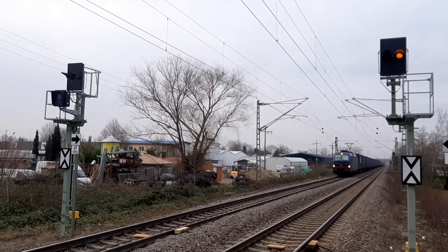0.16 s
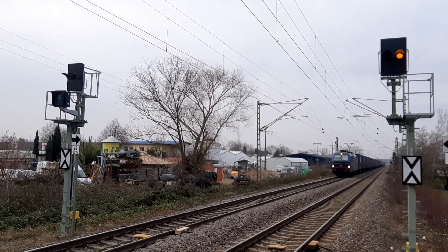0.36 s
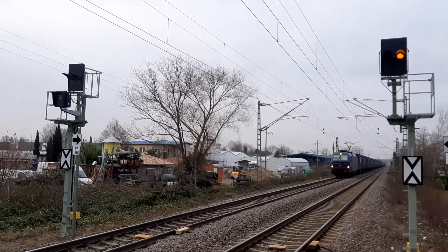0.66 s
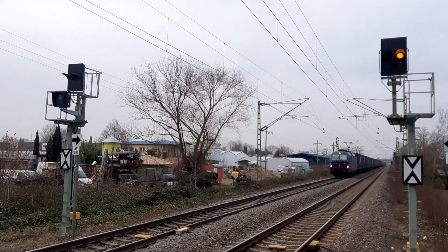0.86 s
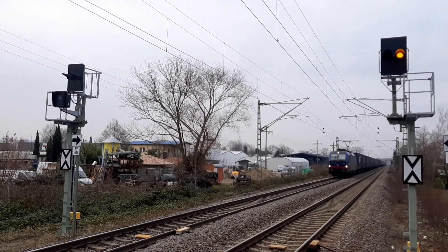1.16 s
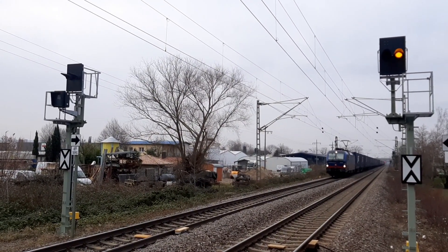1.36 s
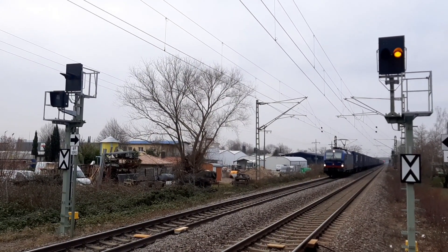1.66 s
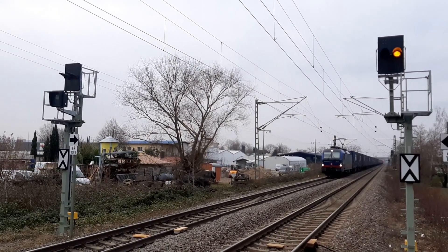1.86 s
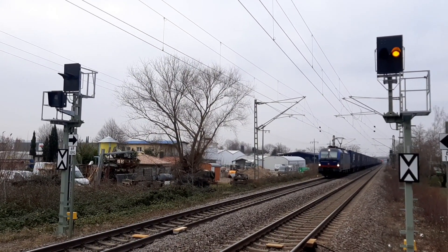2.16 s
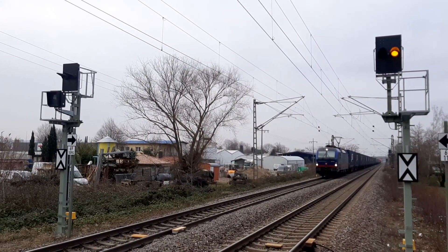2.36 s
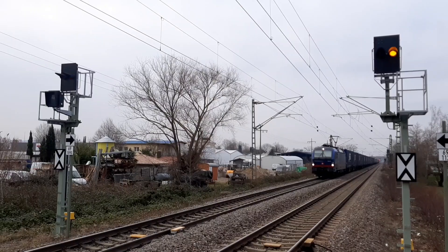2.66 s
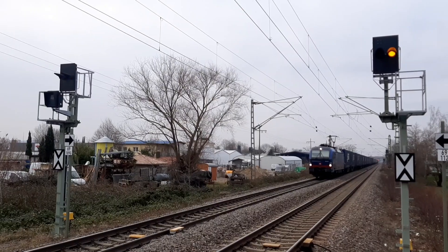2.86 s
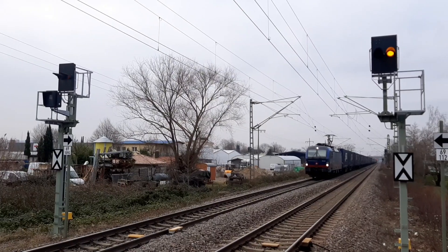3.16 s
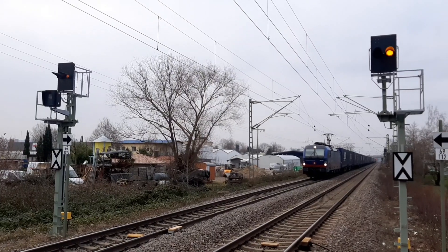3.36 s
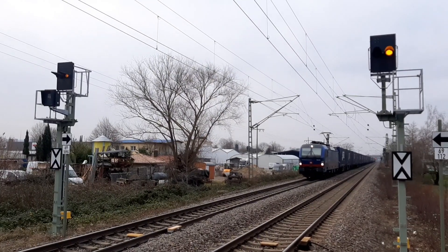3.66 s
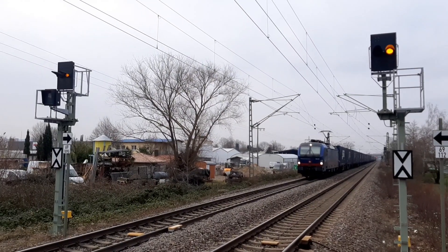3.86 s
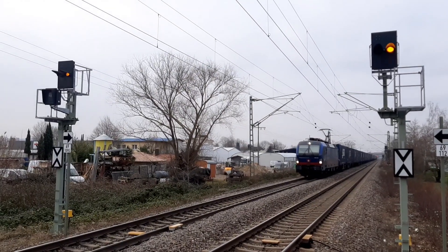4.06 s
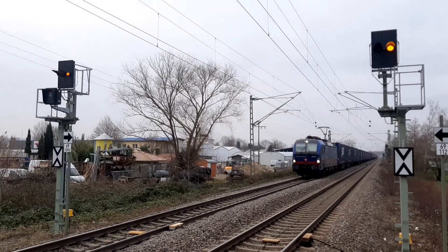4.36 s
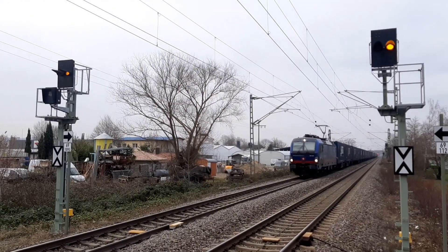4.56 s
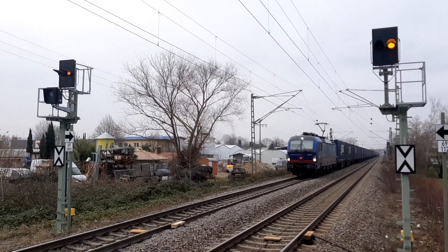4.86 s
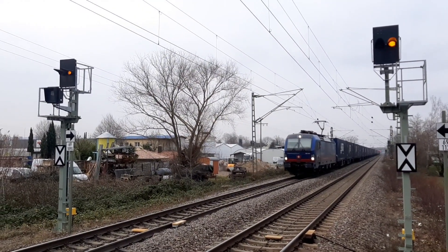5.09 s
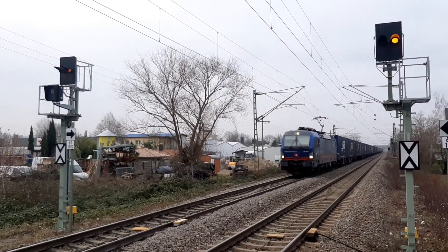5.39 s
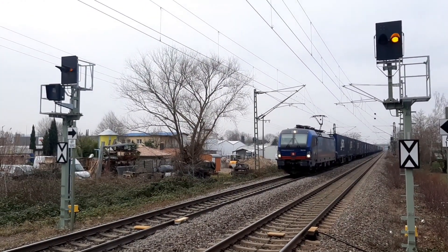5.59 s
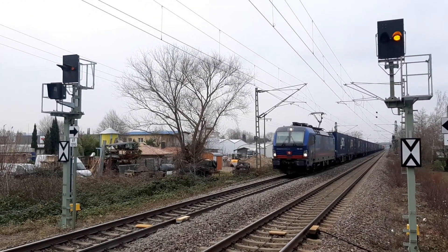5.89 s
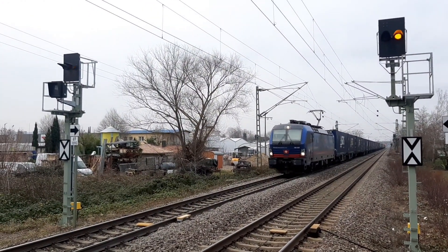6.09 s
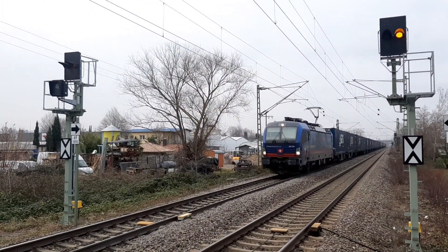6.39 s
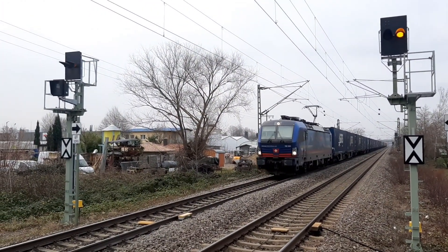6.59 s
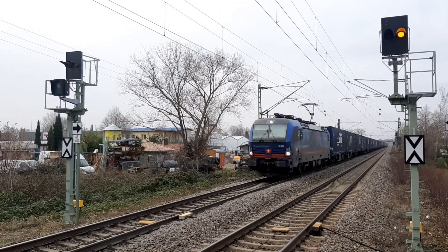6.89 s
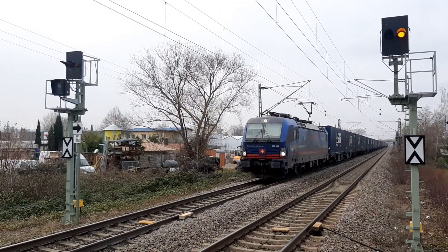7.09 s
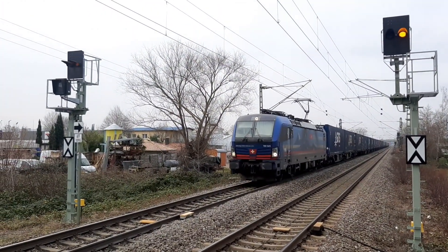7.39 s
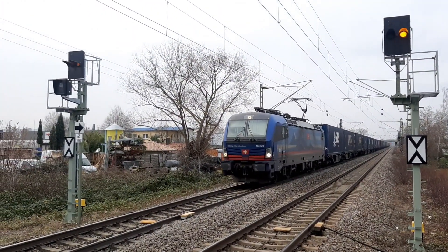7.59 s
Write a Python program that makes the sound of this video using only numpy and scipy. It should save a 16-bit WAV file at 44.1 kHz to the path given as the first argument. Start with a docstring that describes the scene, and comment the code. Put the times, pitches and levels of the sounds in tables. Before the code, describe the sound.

A breezy trackside scene. Faint humming rails and airy background hiss come first, then gusts rumble and crackle against the unprotected microphones, strongest around three, four and six seconds. Rail tones become fuzzier and more insistent, with a thin high whine coming and going. The steady rushing roll of a freight train gradually rises underneath and is loudest at the end.

```python
"""Open railway track in a breeze: an electric freight train draws near a handheld pair of microphones.
The rails sing in two fuzzy bands, noise through drifting resonances with some pure tone in the lower;
the rolling roar and wheel bands are grainy shaped noise that grows. Behind lie a far wash and treble
hiss with ticks. Wind buffets the ports in noise puffs, low thuds, pops and a snap; thin sine whines
come and go."""
import sys
import numpy as np
from scipy import signal
from scipy.fft import rfft, irfft, next_fast_len
from scipy.io import wavfile

SR = 44100
rng = np.random.default_rng(int(sys.argv[2]) if len(sys.argv) > 2 else 0)


def generate_wav(sig):
    """Save sig (samples, or channels by samples) to the path in sys.argv[1] as 16-bit PCM at SR."""
    pcm = np.round(np.clip(np.atleast_2d(sig).T, -1, 1) * 32767).astype(np.int16)
    wavfile.write(sys.argv[1], SR, pcm)


N = 341334
T = np.arange(N) / SR
LAG_S = 22 / SR  # the train reaches the right port first
LEFT_LATE = np.array([[1], [0]])  # picks the left port for a delay


def gain_of(db):
    """Decibels to a factor."""
    return 10 ** (np.asarray(db) / 20)


def evened(x):
    """Scaled to rms 1."""
    return x / np.sqrt(np.mean(x ** 2, axis=-1, keepdims=True) + 1e-20)


def read(points, hz):
    """A spectrum table at the frequencies hz, straight lines over log frequency."""
    f, value = np.transpose(points)
    return np.interp(np.log(hz + 1), np.log(f + 1), value)


def curves(rows):
    """The columns of a time table, one value a sample."""
    s, *columns = np.transpose(rows)
    return [np.interp(T, s, c) for c in columns]


def sides(pan_db):
    """Left and right gains for a left-right level step, at constant summed power."""
    g = gain_of(np.array([pan_db / 2, -pan_db / 2]))
    return g * 2 / np.sqrt((g ** 2).sum(0))


def coloured(x, gain):
    """Applies a gain rule gain(hz) along the spectrum."""
    size = next_fast_len(N)
    return irfft(rfft(x, size) * gain(np.fft.rfftfreq(size, 1 / SR)), size)[..., :N]


def wobble(per_s, channels):
    """Slow chance movement: low-passed noise of rms 1, drawn every 64 samples."""
    steps = N // 64 + 2
    hz = np.fft.rfftfreq(steps, 64 / SR)
    spectrum = rfft(rng.standard_normal((channels, steps))) / (1 + (hz / per_s) ** 2)
    slow = evened(irfft(spectrum, steps))
    return np.array([np.interp(T, np.arange(steps) * 64 / SR, c) for c in slow])


def ring(x, hz, width, steady):
    """A resonance applied twice that follows the curve hz; steady 0-1 irons out its chance swells."""
    turn = np.exp(2j * np.pi * np.cumsum(hz * np.ones(N)) / SR)
    r = np.exp(-np.pi * width / SR)
    slow = signal.lfilter([1], [1, -2 * r, r * r], x * turn.conj())
    ironed = slow / (abs(slow) + 1e-9) ** np.clip(steady, 0, 1)
    return evened((turn * ironed).real)


# how alike the two ports hear a source: [f/Hz, likeness 0-1]
LIKENESS = [(300, 0.94), (800, 0.18), (1500, 1), (2000, 0.42), (3500, 0.22), (5000, 0.19)]


def from_track():
    """Noise that both ports partly share, the left one a little late."""
    a, b = rng.standard_normal((2, N))
    same = lambda hz: np.clip(read(LIKENESS, hz), 0, 1)
    late = coloured(a, lambda hz: same(hz) * np.exp(-2j * np.pi * hz * LAG_S))
    own = coloured(b, lambda hz: np.sqrt(1 - same(hz) ** 2))
    return np.array([late + own, a])


# the rails' song before its chance swells: [t/s, low band level/dB, high band level/dB]
RAIL_LEVELS = [(0, -53, -47), (.17, -57.5, -50.5), (.25, -52.5, -59.5), (.9, -51.5, -55.5),
               (1.03, -62, -54.5), (1.55, -77, -55.5), (1.8, -56, -48.5), (2.07, -63, -51.5),
               (2.3, -59.5, -60), (2.7, -53.5, -48), (2.9, -62, -48.5), (3.2, -54, -47), (3.35, -63, -45.5),
               (3.55, -62, -45.5), (3.8, -48.5, -50.5), (4.0, -46.5, -44.5), (4.15, -48.5, -41.5),
               (4.27, -44.5, -46.5), (4.4, -53.5, -50.5), (4.5, -48, -43), (4.75, -55, -44),
               (5.0, -50, -48), (5.1, -46.5, -50), (5.23, -45, -41), (5.38, -46.5, -52.5),
               (5.55, -45.5, -48.5), (5.8, -44, -44), (5.95, -50.5, -44.5), (6.1, -45, -39.5),
               (6.35, -54.5, -53), (6.55, -46, -39), (6.65, -46.5, -39.5), (6.8, -45, -46.5),
               (7.05, -53, -44), (7.15, -52, -38.5), (7.25, -51, -51), (7.45, -46, -47), (7.55, -43, -42),
               (7.74, -43, -44.5)]
# drifting pitch of the song: [t/s, low band f/Hz, high band f/Hz, share of pure tone in the low band 0-1]
RAIL_PITCH = [(0, 703, 1408, .9), (.95, 703, 1405, .9), (1.02, 703, 1404, 0), (2.8, 705, 1408, 0),
              (3.6, 710, 1418, 0), (4.1, 711, 1419, .2), (4.2, 710, 1419, .85), (4.5, 707, 1420, .6),
              (4.7, 704, 1420, .2), (5.6, 708, 1421, .2), (7.74, 712, 1424, 0)]
# resonance widths of the low and high rail bands: [width/Hz]
RAIL_WIDTHS = (26, 34)
SWELL_DB, SWELLS_PER_S = 2.5, 18  # the song swells and sinks by chance
RAIL_LAG_S, RAIL_SAME = 0.0002, 0.52  # the low song comes from nearer the middle


def rail_song():
    """Two bending bands of the rails: narrow ringing noise, the low one mixed with a pure tone."""
    low_hz, high_hz, pure = curves(RAIL_PITCH)
    swell_depth = [1 - pure, np.ones(N)]  # a pure tone holds steady
    swells = SWELL_DB * wobble(SWELLS_PER_S, channels=2) * swell_depth
    low_db, high_db = curves(RAIL_LEVELS) + swells
    turns = np.cumsum(low_hz) / SR - low_hz * RAIL_LAG_S * LEFT_LATE
    tone = np.sqrt(2) * np.sin(2 * np.pi * turns)
    a, b = rng.standard_normal((2, N))
    late = np.roll(a, round(RAIL_LAG_S * SR))
    near = np.array([RAIL_SAME * late + np.sqrt(1 - RAIL_SAME ** 2) * b, a])
    fuzz = ring(near, low_hz, RAIL_WIDTHS[0], steady=0.23)
    low = pure * tone + np.sqrt(1 - pure ** 2) * fuzz
    high = ring(rng.standard_normal((2, N)), high_hz, RAIL_WIDTHS[1], steady=0.15)
    return gain_of(low_db) * low + gain_of(high_db) * high


# the approach, reference for roar and wheel bands: [t/s, level/dB]
ROLLING_LEVEL = [(0.0, -63.5), (0.34, -63), (1.16, -63), (3.02, -60), (3.12, -58.5), (3.45, -59),
                 (4.68, -56.5), (5.6, -52.5), (7.18, -49.5), (7.39, -47), (7.74, -47)]
# colour of the broad roar: [f/Hz, level/dB per Hz]
ROAR_COLOUR = [(180, -51.5), (300, -8.5), (708, 0), (1160, -12.5), (1440, 2), (1650, -5), (1800, -4.5),
               (2110, -7), (3090, -15), (6360, -30.5), (7800, -52), (10100, -102), (17200, -120)]
# rail and wheel bands, and a low hum of the locomotive at 160 Hz: [f/Hz, width/Hz, level/dB above the rolling
# reference]
ROLLING_BANDS = [(159.8, 16, -3), (1754, 49, -6.5), (1860, 45, -18), (2053, 103, -6.5), (2191, 55, -10.5),
                 (2482, 60, -18.5), (2827, 110, -11.5), (3554, 170, -15), (3834, 240, -17)]
BROAD_DB = 7.5  # the broad roar above the reference of the wheel bands
WANDER = 0.003  # share by which each band drifts in pitch


def rolling():
    """Wheel roughness as grainy noise drives a broad roar and a set of resonant bands, among them a low
    locomotive hum."""
    rolling_db, = curves(ROLLING_LEVEL)
    drive = from_track() * gain_of(1.27 * wobble(27, channels=1))  # uneven wheels make it grainy
    roar = gain_of(BROAD_DB) * evened(coloured(drive, lambda hz: gain_of(read(ROAR_COLOUR, hz))))
    for hz, width, db in ROLLING_BANDS:
        level = gain_of(db + 3.9 * wobble(24, channels=1))
        drifting_hz = hz * (1 + WANDER * wobble(5.3, channels=1)[0])
        roar += level * ring(drive, drifting_hz, width, steady=0)
    return gain_of(rolling_db) * roar


# far outdoor wash: [f/Hz, level/dB per Hz]
WASH_COLOUR = [(140, -39), (240, -2), (615, -7.5), (704, 1.5), (820, -11.5), (1140, -7), (1420, -8.5),
               (1920, -17), (2100, -16.5), (5710, -24), (9000, -57.5), (11700, -80), (19800, -120)]
# balance of the wash: [f/Hz, left-right level/dB]
WASH_PAN = [(300, 1), (1000, 1.5), (3500, -0.5), (4800, -8), (9000, -43)]
# breeze in distant grass and branches; the mean sets the wash, the rest lifts its treble: [t/s, level/dB]
BREEZE_LEVEL = [(0, -56), (.55, -55), (.7, -50.5), (.95, -51.5), (1.2, -55.5), (2.4, -51.5), (2.7, -49.5),
                (3.2, -46), (3.8, -48.5), (4.0, -46.5), (4.6, -50), (7.74, -52.5)]


def air():
    """The far wash of the open country: shaped noise whose treble rises and falls with the breeze."""
    wash = coloured(from_track(), lambda hz: gain_of(read(WASH_COLOUR, hz)) * sides(read(WASH_PAN, hz)))
    treble = coloured(wash, lambda hz: 1 / (1 + (2500.0 / (hz + 1)) ** 4))
    breeze_db, = curves(BREEZE_LEVEL)
    mean_db = breeze_db.mean()
    lift = gain_of(breeze_db - mean_db)
    level = gain_of(mean_db + 1.25 * wobble(13.0, channels=1))
    return level * (wash + (lift - 1) * treble) / wash.std()


# high hiss that swells briefly, before its colour: [t/s, level/dB, left-right level/dB]
HISS_LEVEL = [(0, -72, -7), (.17, -79.5, -4), (1.0, -80.5, -1), (2.3, -82, -1.5), (3.15, -76, -4),
              (3.45, -78.5, -3), (3.86, -69.5, -8), (3.95, -62, -2), (4.1, -62, -6), (4.29, -66.5, -14),
              (4.39, -63, -20), (4.41, -71, -12), (4.55, -70.5, -14), (4.65, -78.5, -4), (5.5, -76.5, -5),
              (6.2, -75, -6), (7.74, -74.5, -4)]
# colour of hiss and ticks: [f/Hz, level/dB]
HISS_SPECTRUM = [(2500, -46.5), (4000, -32.5), (6000, 10), (7600, 4), (8200, -40), (9300, -11), (10300, -3),
                 (11500, 1), (13000, 1.5), (15600, 3)]
# faint dry ticks, before their colour: [t/s, level/dB, left-right level/dB]
DRY_TICKS = [(4.389, -52, -14), (4.545, -54, -10), (4.572, -43, -14), (5.942, -61, -6)]


def hiss():
    """White noise and short decaying noise ticks, through a treble colour with a hollow near 8 kHz."""
    db, pan = curves(HISS_LEVEL)
    drive = gain_of(db + 0.87 * wobble(19, channels=2)) * sides(pan) * rng.standard_normal((2, N))
    decay = np.exp(-np.arange(80) / 24.0)  # in samples
    for s, tick_db, tick_pan in DRY_TICKS:
        at = round(s * SR)
        grit = np.diff(rng.standard_normal((2, 81))) / 2
        drive[:, at:at + 80] += gain_of(tick_db) * sides(tick_pan)[:, None] * decay * grit
    return coloured(drive, lambda hz: gain_of(read(HISS_SPECTRUM, hz)))


def eddies(colour, lumps_db, shared, puffs_per_s):
    """Turbulence at the ports: a lumpy train of small puffs, a share of it common to both."""
    puffs = rng.random((3, N)) < puffs_per_s / SR
    left, right, both = rng.standard_normal((3, N)) * puffs
    train = gain_of(lumps_db) * (np.array([left, right]) + shared * both)
    return evened(coloured(train, lambda hz: gain_of(read(colour, hz))))


# colour of the low buffet: [f/Hz, level/dB per Hz]
BUFFET_COLOUR = [(12, -40), (22, -13), (40, 3.5), (65, 8), (110, 4.5), (200, -1.5), (300, -22), (500, -57),
                 (1500, -120)]
# colour of the flutter above it: [f/Hz, level/dB per Hz]
FLUTTER_COLOUR = [(130, -50), (200, -1), (280, -2.5), (420, -5.5), (650, -11), (1000, -18), (2000, -52),
                  (4000, -71.5), (7000, -120)]
# wind between its lumps: [t/s, low buffet level/dB, upper flutter level/dB]
WIND_LEVELS = [(0, -43, -62), (0.5, -52.5, -59.5), (1, -49, -53), (1.4, -44, -65), (1.7, -40, -52),
               (2.0, -42.5, -62), (2.4, -45, -54), (2.9, -40, -48.5), (3.15, -30.5, -40),
               (3.35, -37, -53.5), (3.9, -38.5, -48.5), (4.15, -31, -46.5), (4.3, -46, -49.5),
               (5, -47.5, -49.5), (5.6, -46.5, -48), (5.7, -31.5, -36), (6.0, -33.5, -46), (6.2, -46, -43),
               (6.45, -27, -37.5), (6.75, -47, -49.5), (7.2, -38, -45), (7.73, -39.5, -42.5)]
# lumps of air that thump both ports: [t/s, thud level/dB, thud f/Hz, flutter level/dB, left-right level/dB]
AIR_LUMPS = [(0.11, -32.5, 61.5, -53, 2), (1.261, -32.5, 71.6, -48.5, 4), (1.405, -35.5, 100, -56, 0),
             (1.47, -30, 62.4, -43.5, -10), (1.538, -43, 100, -67, -10), (1.604, -26, 164, -38.5, 2.5),
             (1.658, -26.5, 89.5, -46, -1), (1.713, -32, 128, -56, -5), (1.824, -30, 85.5, -43.5, -8),
             (1.855, -33, 142, -48, -10), (1.91, -29, 130, -51, 4), (2.089, -34, 167, -43, -8),
             (2.286, -32.5, 112, -48, -5), (2.556, -32.5, 65, -51, 1), (2.574, -29, 59, -74, 1),
             (2.611, -32, 110, -46, 3), (2.683, -38, 70, -43.5, -4), (2.777, -33, 75, -42.5, 0),
             (2.846, -35, 104, -60, -4), (3.025, -45, 126, -51, 9), (3.092, -23, 89, -46, -24),
             (3.176, -24, 105, -37, -22), (3.254, -34, 57, -43, -4), (3.438, -32, 92, -49, 2),
             (3.479, -27, 75, -40.5, -10), (3.597, -31, 109, -35.5, -2), (3.69, -38, 70.4, -55, -4),
             (3.727, -23, 102, -39.5, -1.5), (3.816, -25.5, 104, -30.5, 2.5), (3.835, -26, 100, -34, 10),
             (3.909, -24.5, 96, -53, -8), (3.976, -25, 98, -34, -7), (4.02, -29, 123, -40, 2),
             (4.055, -31, 70, -56, -12), (4.098, -30.5, 111, -41, -8), (4.138, -23, 90, -45, -5),
             (4.161, -22, 100, -37.5, 3), (4.343, -37, 97, -64, -17), (4.544, -31.5, 90, -57, -1),
             (4.638, -38.5, 47.5, -43, -0.5), (4.799, -34, 64, -52, -10), (4.956, -29.5, 77, -49, -5),
             (5.703, -26.5, 77.5, -50, 2), (5.765, -20.5, 64, -49, -1), (5.795, -25.5, 70, -47, 0),
             (5.82, -35, 80, -32.5, 0), (5.848, -36, 90, -35.5, 0), (5.905, -23.5, 73, -50, 2),
             (6.002, -24.5, 81.5, -27.5, 4), (6.049, -29, 110, -42.5, 2), (6.265, -25, 70, -30.5, 0),
             (6.296, -24, 90, -29.5, 1), (6.326, -26.5, 60.3, -48, 2), (6.389, -31, 100, -39, -3),
             (6.418, -36, 80, -39, 5), (6.506, -25, 100, -30, 4), (6.524, -30, 110, -34, -1),
             (6.586, -32.5, 91, -44, -1), (6.63, -28, 73, -36, -8), (6.68, -30.5, 78, -52, -20),
             (6.92, -33.5, 73.5, -63, -8), (7.109, -34, 70, -57, -20), (7.55, -31.5, 72.6, -35, -2)]
LUMP_TURNS, FLUTTER_LUMP_S = 0.92, 0.0096  # half widths: of a thud in cycles, of its flutter in s
# the bass drops out on one port for a moment: [start t/s, length t/s, port -1 left or 1 right]
BASS_DROPOUTS = [(0.198, 0.15, -1), (1.918, 0.14, -1), (2.315, 0.085, -1), (2.693, 0.05, -1),
                 (2.783, 0.16, -1), (3.223, 0.13, -1), (3.86, 0.048, -1), (4.65, 0.03, -1),
                 (4.74, 0.13, -1), (4.934, 0.018, -1), (6.085, 0.196, 1), (6.797, 0.084, -1),
                 (6.899, 0.095, -1), (7.136, 0.15, -1), (7.424, 0.06, -1), (7.587, 0.088, -1)]
DROP_DB, DROP_EDGE_S = -41.5, 0.015


def gusts():
    """Low buffet and the flutter above it; each lump adds a short low thud and a bump of flutter."""
    low_db, flutter_db = curves(WIND_LEVELS)
    flutter_power, thuds = gain_of(2 * flutter_db), np.zeros((2, N))
    starts = rng.random((len(AIR_LUMPS), 2))
    for (s, thud_db, hz, bump_db, pan_db), (turn, skew) in zip(AIR_LUMPS, starts):
        near = slice(max(round((s - .1) * SR), 0), round((s + .1) * SR))
        u = T[near] - s
        port_turn = np.array([[0], [0.73 * (skew - .5)]])  # the ports differ in phase, in cycles
        swing = np.sqrt(2) * np.cos(2 * np.pi * (hz * u + turn + port_turn))
        level = gain_of(thud_db + np.minimum([[pan_db], [-pan_db]], 0))  # panning only turns a port down
        thuds[:, near] += level * np.exp(-(u * hz / LUMP_TURNS) ** 2) * swing
        flutter_power[near] += gain_of(2 * bump_db) * np.exp(-(u / FLUTTER_LUMP_S) ** 2)
    drop = np.zeros((2, N))
    for start, length, port in BASS_DROPOUTS:
        inside = np.minimum(T - start, start + length - T)
        drop[int(port > 0)] += np.clip(inside / DROP_EDGE_S + 1, 0, 1)
    lumpy = wobble(20, channels=2)  # buffet and flutter heave together
    low = thuds + gain_of(low_db) * eddies(BUFFET_COLOUR, 2.76 * lumpy, shared=0.77, puffs_per_s=300)
    flutter = eddies(FLUTTER_COLOUR, 3.3 * lumpy, shared=0.53, puffs_per_s=420)
    return low * gain_of(DROP_DB * np.minimum(drop, 1)) + np.sqrt(flutter_power) * flutter


# the thin whine comes and goes, before its chance swells: [start t/s, end t/s, level/dB]
WHINE_SPELLS = [(1.1, 2.0, -77), (1.897, 2.725, -76), (3.1, 3.5, -77), (3.8, 4.7, -76.5), (5.0, 5.4, -79),
                (5.3, 6.12, -69)]
WHINE_HZ = 3872


def whines():
    """Thin sine tones that waver a little in pitch and level and fade in and out."""
    out = np.zeros((2, N))
    for start, end, db in WHINE_SPELLS:
        fade = np.clip(np.minimum(T - start, end - T) / .1, 0, 1)
        wavering_hz = WHINE_HZ * (1 + .0008 * wobble(9, channels=1)[0])
        turns = np.cumsum(wavering_hz) / SR - WHINE_HZ * LAG_S * LEFT_LATE
        level = gain_of(db + 5.7 * wobble(12.0, channels=2))
        out += level * fade * np.sqrt(2) * np.sin(2 * np.pi * turns)
    return out


# sharp pops of air, before filtering: [t/s, port -1 left or 1 right, peak level/dB, f/Hz,
# crack level/dB above the peak]
AIR_POPS = [(1.136, -1.0, -32, 270, -25), (1.269, -1.0, -29.5, 240, -25), (1.281, 1.0, -30, 215, -25),
            (1.463, -1.0, -22.5, 300, -25), (1.473, 1.0, -21, 220, -18), (1.578, 1.0, -31, 235, -25),
            (1.653, 1.0, -26, 300, -15), (1.688, 1.0, -31, 235, -25), (1.852, -1.0, -30, 280, -25),
            (1.881, 1.0, -32, 215, -25), (2.624, -1.0, -26.5, 280, -20), (2.667, -1.0, -32, 250, -22),
            (2.686, -1.0, -29, 430, -20), (2.967, 1.0, -33, 210, -20), (2.992, -1.0, -31, 210, -20),
            (2.998, 1.0, -32, 335, -22), (3.03, -1.0, -26, 245, -22), (3.031, 1.0, -30, 205, -25),
            (4.813, -1.0, -24, 450, -20), (4.928, -1.0, -27, 600, -15), (6.28, 1.0, -22, 330, -30),
            (6.39, 1.0, -21, 260, -30), (1.614, -1.0, -24, 363, -23), (1.625, -1.0, -27, 360, -7),
            (3.051, -1.0, -25.5, 440.0, -6), (3.073, -1.0, -20, 696, -13), (3.161, -1.0, -21, 540.0, -16),
            (3.169, -1.0, -18.5, 820.0, -8.5), (3.186, -1.0, -14.5, 410.0, -15),
            (3.197, 1.0, -16, 380, -30), (3.209, 1.0, -19, 260.0, -19), (3.231, -1.0, -15.5, 490, -6.5),
            (3.24, 1.0, -19.5, 305, -10), (3.248, -1.0, -24, 510.0, 1), (3.829, -1.0, -15.5, 440.0, -30),
            (3.869, -1.0, -24, 730, -2.5), (3.894, -1.0, -28, 610.0, -10), (4.159, 1.0, -16.5, 209, -22),
            (4.826, -1.0, -22.5, 600, -9), (5.669, -1.0, -15, 434, -22), (5.675, 1.0, -20.5, 470.0, -24),
            (5.69, -1.0, -20.5, 383, -16), (5.69, 1.0, -22, 412, -22), (5.762, 1.0, -10.5, 393, -23),
            (5.763, -1.0, -23, 457, -23), (5.818, -1.0, -19, 378, -8.5), (5.891, -1.0, -14.5, 256, -20),
            (5.89, 1.0, -9.5, 328, -17.5), (5.909, -1.0, -15, 350, -29), (6, -1.0, -28, 282, -21),
            (6.0, 1.0, -17, 334, -17.5), (6.211, 1.0, -19, 670, -12), (6.237, 1.0, -30.5, 1200.0, 6),
            (6.269, 1.0, -21, 450, -22), (6.428, -1.0, -14, 440.0, -33), (6.433, 1.0, -7.5, 400.0, -15),
            (6.437, -1.0, -7.5, 720, -16), (6.448, -1.0, -15, 470.0, -16), (6.454, 1.0, -8.5, 380.0, -29),
            (6.458, -1.0, -25, 460.0, -17.5), (6.483, -1.0, -13, 360, -17), (6.501, 1.0, -24, 530.0, -24),
            (6.509, -1.0, -16.5, 277, -25), (6.634, 1.0, -19, 338, -40)]
# colour of the cracks: [f/Hz, level/dB per Hz]
CRACK_COLOUR = [(200, -20), (600, -4), (1400, 9), (2400, -6.5), (3500, -19), (5000, -51.5), (8000, -111)]


def pops():
    """Each pop is a brief dip of pressure, a fast-fading cosine, with a noise crack on its peak."""
    swings, cracks, u = np.zeros((2, N)), np.zeros((2, N)), np.arange(-400, 400) / SR
    for s, port, db, hz, crack_db in AIR_POPS:
        side, at = int(port > 0), round(s * SR) - 400
        swing = np.exp(-abs(u * hz) * 2) * np.cos(2 * np.pi * hz * u)
        swings[side, at:at + len(u)] -= gain_of(db) * swing
        burst = np.exp(-abs(u) / 0.0047) * rng.standard_normal(len(u))
        cracks[side, at:at + len(u)] += gain_of(db + crack_db) * burst
    dull = lambda hz: 1 / (1 + (hz / 2000.) ** 4)
    return coloured(swings, dull) + coloured(cracks, lambda hz: gain_of(read(CRACK_COLOUR, hz)))


# colour of the snap: [f/Hz, level/dB]
SNAP_COLOUR = [(250, -24), (450, 0), (700, 0), (1000, -6), (1500, -5), (2400, -16), (3400, -20),
               (4500, -31), (6500, -36), (8000, -70)]
SNAP_S, SNAP_DB, SNAP_PAN_DB = 6.1112, -15.5, -30  # level is the peak of the ports' mean


def snap():
    """One hard snap of air on the right port: a single click coloured by its spectrum."""
    click = np.zeros((2, N))
    click[:, round(SNAP_S * SR)] = sides(SNAP_PAN_DB)
    # a phase turn of 0.4 rad makes the click lopsided
    click = coloured(click, lambda hz: gain_of(read(SNAP_COLOUR, hz)) * np.exp(.4j))
    return gain_of(SNAP_DB) * click / abs(click.mean(0)).max()


def scene():
    """Train and open air, with the wind at the ports over them."""
    train = rail_song() + rolling()
    wind = gusts() + pops() + snap()
    return train + air() + hiss() + wind + whines()


def record(dry):
    """The band limit: a steep low-pass at 15.6 kHz."""
    lowpass = signal.firwin(511, 15600, window=("kaiser", 9), fs=SR)
    return signal.oaconvolve(dry, lowpass[None], "same")


dry = scene()
out = record(dry)
generate_wav(out)
```